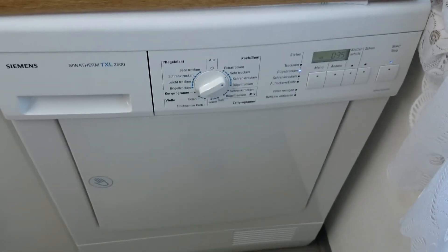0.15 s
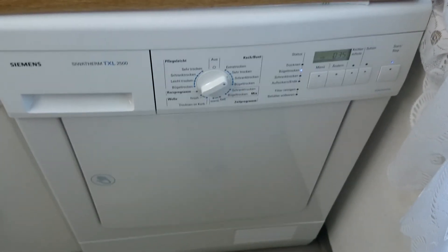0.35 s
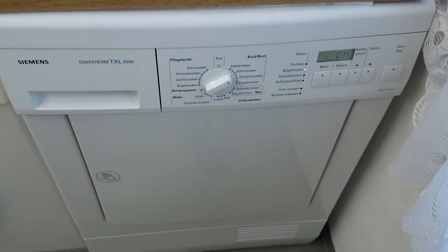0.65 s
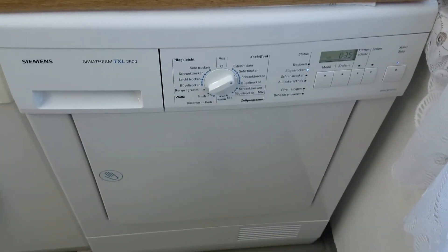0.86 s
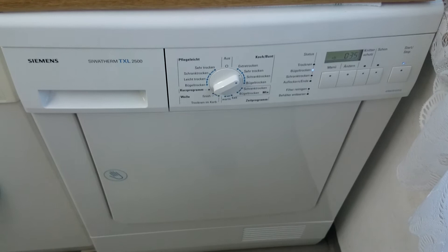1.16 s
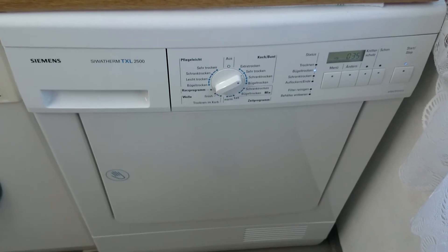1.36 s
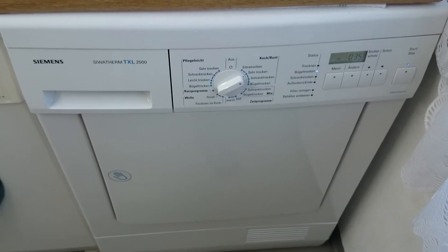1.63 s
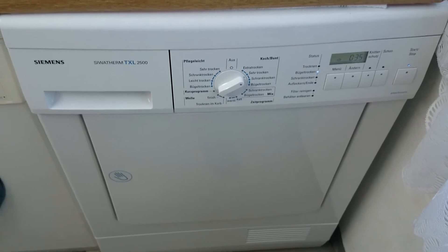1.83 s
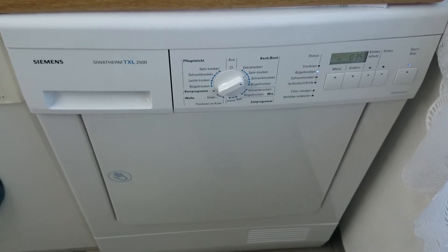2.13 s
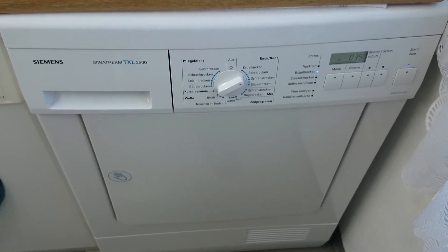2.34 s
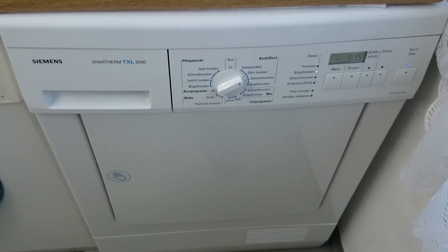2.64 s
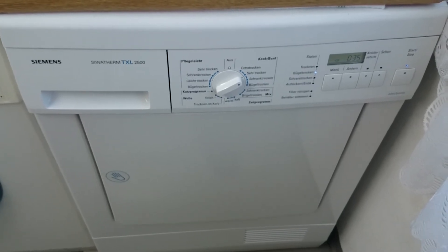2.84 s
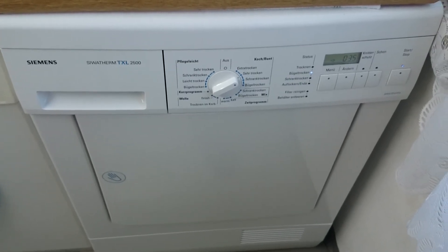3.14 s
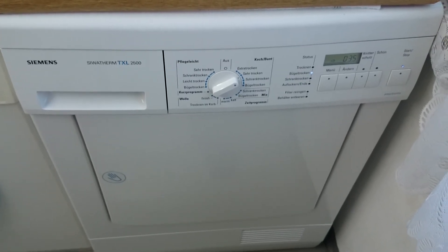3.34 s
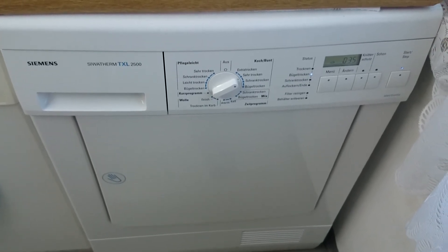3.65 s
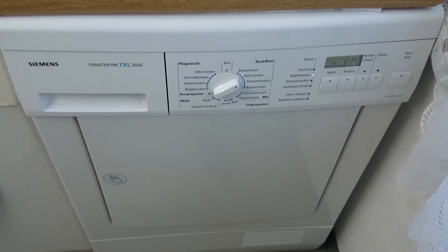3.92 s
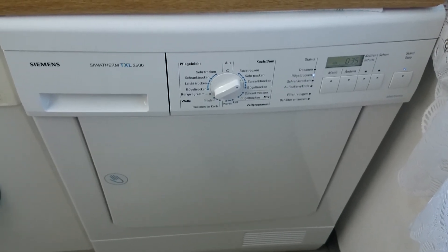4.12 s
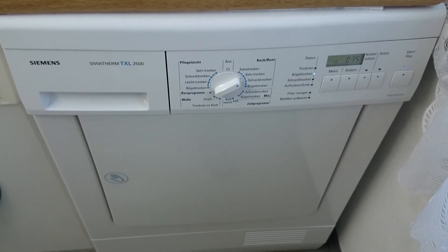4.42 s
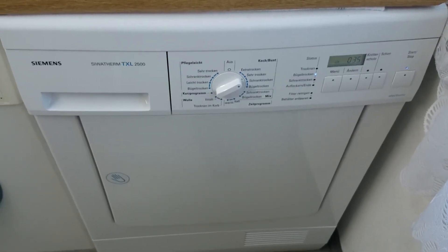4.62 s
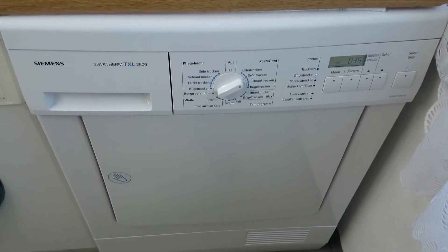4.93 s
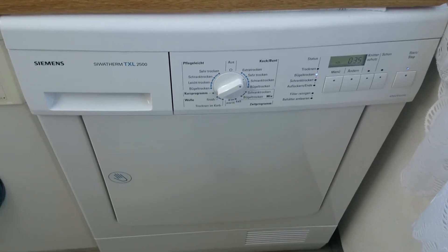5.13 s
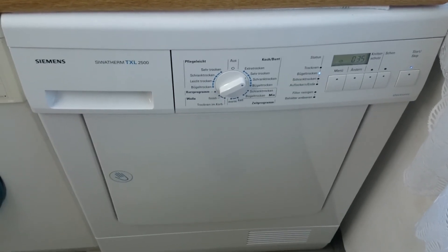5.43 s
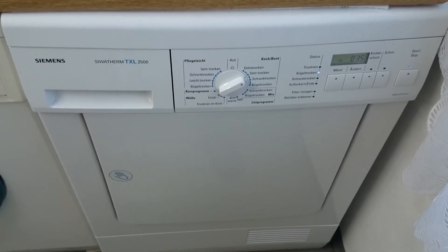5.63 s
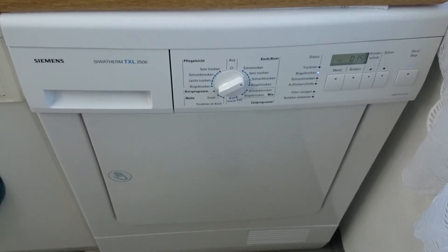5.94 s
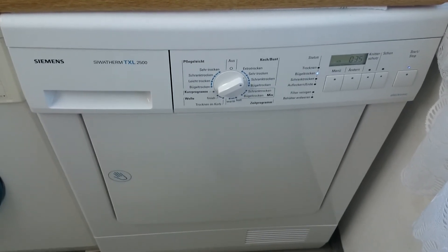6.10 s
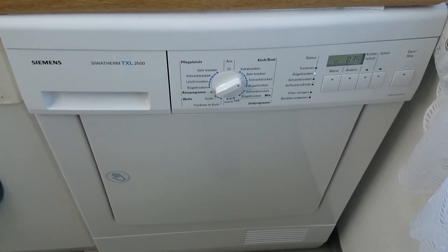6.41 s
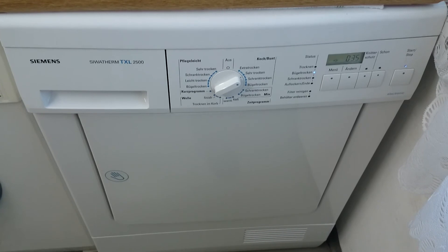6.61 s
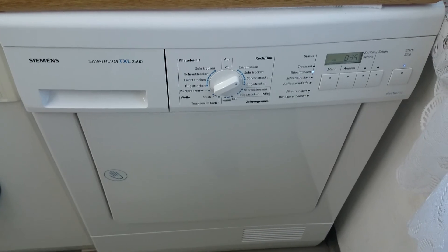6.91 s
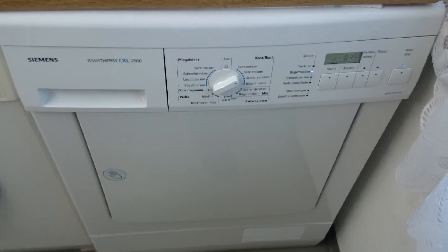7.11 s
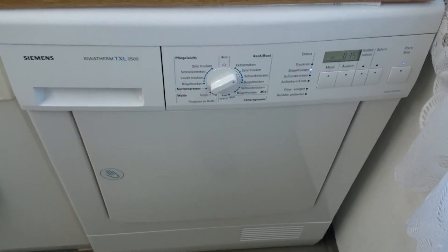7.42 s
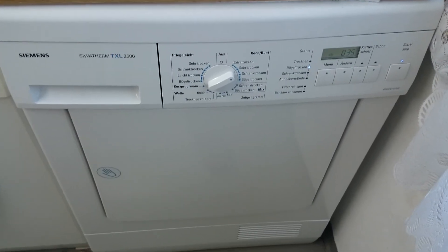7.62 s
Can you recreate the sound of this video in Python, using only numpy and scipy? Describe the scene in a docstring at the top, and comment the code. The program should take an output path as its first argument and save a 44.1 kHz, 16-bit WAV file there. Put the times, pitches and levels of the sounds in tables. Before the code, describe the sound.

Steady dryer drone, deep and slightly heavier on the right, with faint whine and airy hiss more on the left. Every second or so the load tumbles, swishing and dropping dully at irregular moments. One hard little button tick rings the drum. Slow low grip pressure stirs the right side, and a late fingertip knock gives a thud and click.

```python
"""In a small room, a tumble dryer runs close to a hand-held camera with a left and a right port.
Its motor hums and sags once per turn, as sines locked to the shaft angle; other tones hold their pitch.
The drum rumbles through the cabinet panels and air rushes in the ducts, both as shaped noise.
Laundry swishes and lands as decaying noise, and a button rings the drum wall as damped sines.
The hand's grip presses as slow noise; near the end a finger knocks the camera body."""
import sys
import numpy as np
from scipy import signal
from scipy.fft import rfft, irfft, next_fast_len
from scipy.io import wavfile
from scipy.ndimage import uniform_filter1d, map_coordinates

SR = 44100
rng = np.random.default_rng(int(sys.argv[2]) if len(sys.argv) > 2 else 0)


def log_audio(samples):
    """Write samples as a 16-bit WAV file to the path given in sys.argv[1]."""
    # one column per channel
    frames = np.atleast_2d(samples).T
    # limit to full scale, then quantise
    limited = np.clip(frames, -1, 1)
    pcm = np.round(limited * 32767).astype(np.int16)
    wavfile.write(sys.argv[1], SR, pcm)


N = 342304  # length [samples]


def amp(db):
    """Decibel law: level to amplitude gain."""
    return 10 ** (np.asarray(db) / 20)


def unit(x):
    """Normalisation to an rms of 1."""
    return x / np.sqrt(np.mean(x ** 2) + 1e-20)


def along(points, hz):
    """Interpolation of each value column of a spectrum on a logarithmic frequency axis."""
    f, *columns = np.transpose(points)
    return np.array([np.interp(np.log(hz + 1), np.log(f + 1), column) for column in columns])


def wobble(rate):
    """Random modulation: a smooth curve through rate random knots a second."""
    knots = rng.standard_normal(int(N * rate / SR) + 4)
    return map_coordinates(knots, [np.arange(N) * rate / SR])


def filtered(x, response):
    """Linear filtering: the spectrum of x times a response of frequency."""
    size = next_fast_len(N + SR // 2)
    hz = np.fft.rfftfreq(size, 1 / SR)
    return irfft(rfft(x, size) * response(hz), size)[..., :N]


def bell(hz, centre, width):
    """Resonance: a steep-sided gain curve, 1 at its centre."""
    return 1 / (1 + (np.sqrt(2) * (hz - centre) / width) ** 2)


def add(track, s, sound):
    """Superposition: mix a sound into a track at a time in seconds."""
    part = track[..., round(s * SR):][..., :sound.shape[-1]]
    part += sound[..., :part.shape[-1]]


TURN_S = 1.19  # one turn of the drum


def turning(peak_s, count=1):
    """Periodic modulation: between -1 and 1, count times per turn of the drum, highest at peak_s."""
    return np.cos(2 * np.pi * count * (np.arange(N) / SR - peak_s) / TURN_S)


def swells(rows):
    """Gaussian envelopes in dB, one per (middle, length at half height, height) row."""
    t = np.arange(N) / SR
    return sum(db * .5 ** ((2 * (t - s) / length) ** 2) for s, length, db in rows)


# interaural-style phase between the ports: (frequency [Hz], lead of the left port [rad])
PORT_LEAD = [(40, 0.78), (100, 0.47), (180, 0.52), (400, 0.5), (540, 0.86), (750, 0.72), (1000, 0.13),
             (1500, 0.34), (3000, -1.7), (7000, -2)]


def tone(phase, hz):
    """Phase difference between ports: a sine of rms 1, split evenly about its own phase."""
    lead = along(PORT_LEAD, hz)[0]
    return np.sqrt(2) * np.sin(phase + lead * np.array([[.5], [-.5]]))


# motor, fan and bearing tones: (multiple of the shaft speed [1], left level [dB], right level [dB])
SHAFT_TONES = [(2, -75, -55), (3.954, -66.5, -63), (16.08, -68, -75.5), (16.89, -68.5, -71),
               (25.06, -63.5, -70.5), (29.9, -77, -72.5), (31.06, -91, -67), (32.16, -71.5, -77.5)]
# mains hum and other steady tones: (frequency [Hz], left level [dB], right level [dB])
STEADY_TONES = [(98.9, -52, -50), (142, -64, -61), (176, -64.5, -62), (186, -62.5, -58.5),
                (243.4, -61.5, -60), (368.5, -69.5, -66.5), (401, -67, -68.5)]
# mean motor speed, its swing as the load is lifted and dropped, and its random drift
SHAFT_HZ, SAG_HZ, WANDER_HZ = 43.91, 0.258, 0.059
FASTEST_S = 0.072  # when in the turn the load has fallen and the motor runs freest
DRONE_DB, DRONE_WAVER_DB = (-41, -34.5), 0.35  # hum of the unbalanced shaft (left, right), random waver
# the hum swells once and twice a turn: when both peak, and how far
DRONE_PEAK_S, ONCE_DB, TWICE_DB = 0.27, 0.5, 1.74
STEADY_WAVER_DB = 1.34  # random level waver of the steady tones


def motor(flutter_db=2, drift=0.31):
    """Order-locked tones: shaft, fan and bearings follow the motor speed; steady tones do not."""
    speed = SHAFT_HZ + SAG_HZ * turning(FASTEST_S) + WANDER_HZ * wobble(4)
    angle = 2 * np.pi * np.cumsum(speed) / SR
    swell_db = ONCE_DB * turning(DRONE_PEAK_S) + TWICE_DB * turning(DRONE_PEAK_S, count=2)
    swell_db = swell_db + DRONE_WAVER_DB * wobble(3.2)
    out = amp(DRONE_DB)[:, None] * amp(swell_db) * tone(angle, speed.mean())
    for multiple, *ports_db in SHAFT_TONES:
        flutter = amp(flutter_db * wobble(6))
        phase = multiple * angle + drift * wobble(9)
        out += amp(ports_db)[:, None] * flutter * tone(phase, multiple * speed.mean())
    for hz, *ports_db in STEADY_TONES:
        phase = 2 * np.pi * hz * np.arange(N) / SR + hz / 1100 * wobble(6)  # high lines waver most
        waver = amp(STEADY_WAVER_DB * wobble(4.0))
        out += amp(ports_db)[:, None] * waver * tone(phase, hz)
    return out


# coherence of the noise at the two ports: (frequency [Hz], left-right likeness [1])
PORT_LIKENESS = [(30, 0.91), (45, .97), (75, 0.41), (180, 1), (420, 0.95), (600, 0.24), (900, 0.84),
                 (1350, 0.26), (1650, 0.1), (4000, 0.16), (9000, 0.061)]


def rush(gain, patchy_db):
    """Partly coherent noise at both ports, patchy in time and frequency, with gain(hz) per root Hz."""
    z = signal.stft(rng.standard_normal((2, N)), nperseg=1024)[2]
    patches = rng.standard_normal(z.shape[1:])
    patches = uniform_filter1d(uniform_filter1d(patches, size=7, axis=0), size=8, axis=1)
    pair = unit(signal.istft(z * amp(patchy_db * unit(patches)), nperseg=1024)[1][:, :N])

    def mid_side_gains(hz):
        turn = np.arccos(np.clip(along(PORT_LIKENESS, hz)[0], -1, 1)) / 2
        return np.array([np.cos(turn), np.sin(turn)])

    mid, side = filtered(pair, mid_side_gains)
    ports = np.array([mid + side, mid - side]) * np.sqrt(SR / 2)
    return filtered(ports, lambda hz: gain(hz) * np.exp(.5j * along(PORT_LEAD, hz) * [[1], [-1]]))


# cabinet and duct resonances:
# (frequency [Hz], width [Hz], left level [dB per Hz], right level [dB per Hz])
CABINET_MODES = [(55, 36, -72.5, -62.5), (89.3, 10.4, -70, -63), (107.5, 19.8, -71.5, -61.5),
                 (136.2, 10.3, -64.5, -63.5), (182.7, 17.3, -68.5, -68.5), (232, 41.6, -74.5, -70),
                 (336.6, 37.6, -72, -79.5), (389.2, 53.4, -74, -72.5), (453, 43, -76, -88),
                 (861, 62, -83.5, -85), (909, 43, -80.5, -87), (1073, 26, -82.5, -84),
                 (1185, 80, -82, -100), (1411, 43, -82.5, -84.5), (1450, 38, -79, -109),
                 (1500, 18, -79, -100), (3413, 55, -93.5, -106), (3750, 130, -99, -110),
                 (7580, 57, -101, -120), (12940, 910, -110, -125)]
# air in the ducts: (frequency [Hz], left level [dB per Hz], right level [dB per Hz])
DUCT_AIR = [(20, -90, -117), (60, -99, -94), (293, -78, -83), (430, -82, -84), (584, -83, -84),
            (810, -84, -87.5), (1110, -86, -87.5), (1310, -89, -91.5), (1846, -93.5, -97.5),
            (2170, -100, -102), (2570, -112, -114), (6000, -135, -135)]
# air hiss at the vents: (frequency [Hz], left level [dB per Hz], right level [dB per Hz])
VENT_HISS = [(900, -125, -125), (2050, -101, -103), (2660, -99, -100), (3280, -99, -102), (4300, -99, -104),
             (4940, -103, -103), (6740, -103, -101), (7250, -100, -109), (7680, -95.5, -111),
             (8720, -104, -114), (10300, -106, -115), (11460, -117, -117), (13100, -114, -114),
             (15000, -120, -123)]
# larger pieces sliding down the drum wall: (middle [s], length [s], rise over the hiss [dB])
SLIDING_PIECES = [(2.3, 0.14, 1), (3.13, 0.092, 4), (4.31, 0.097, 4), (4.73, 0.14, 1)]
TUMBLE_S, TUMBLE_DB = 1.11, 0.58  # when in the turn the falling load rumbles most, and by how much
SLIDE_S, SLIDE_DB = 1.15, 0.5  # when in the turn the laundry slides most, and by how much
RUB_S = 1.08  # when in the turn the seal rubs most


def drum_and_air(rub_db=4, churn_db=0.5, uneven_db=0.23):
    """Resonance and turbulence: the drum shakes the cabinet; air and sliding laundry hiss."""
    rumble_db = TUMBLE_DB * turning(TUMBLE_S) + uneven_db * wobble(4.15)  # no two turns fall alike
    swish_db = SLIDE_DB * turning(SLIDE_S) + swells(SLIDING_PIECES)
    churn = churn_db * wobble(14)  # the load slumps unevenly

    def panels(hz):
        power = sum((amp(ports_db)[:, None] * bell(hz, centre, width)) ** 2
                    for centre, width, *ports_db in CABINET_MODES)
        return np.sqrt(power)

    rumble = rush(panels, patchy_db=0.85) * amp(rumble_db)
    duct = rush(lambda hz: amp(along(DUCT_AIR, hz)), patchy_db=1.73) * amp(rumble_db + churn)
    hiss = rush(lambda hz: amp(along(VENT_HISS, hz)), patchy_db=1.52) * amp(swish_db + 1.3 * churn)
    rub = ((1 + turning(RUB_S)) / 2) ** 5  # the drum seal whispers once a turn
    # added to the hiss, this changes its level above 11400 Hz
    seal = filtered(hiss, lambda hz: hz > 11400) * (amp(rub_db * rub - 1.5) - 1)
    return rumble + duct + hiss + seal


# spectrum of the hand's pressure on the port: (frequency [Hz], relative level [dB])
PRESSURE_SPECTRUM = [(1, -12.5), (3, -8), (8, -7), (14, -7), (21, -17), (30, -31), (45, -31), (90, -68),
                     (300, -107)]
# the hand shifts its grip: (middle [s], length [s], rise over the resting hand [dB])
GRIP_SHIFTS = [(.63, 0.35, 6), (3.1, 0.11, 8), (7.25, 0.23, 11.5)]
# the camera shell clicks when pressed and when let go: (time [s], relative level [dB])
SHELL_CLICKS = [(7.1462, -8.5), (7.1586, -25)]
# modes of the shell: (frequency [Hz], relative level [dB], t60 [s])
SHELL_MODES = [(2660, -17.5, 0.0016), (3700, -29, 0.0081), (4060, -33, 0.018), (5500, -31, 0.0059),
               (8180, -13.5, 0.0036), (10400, -12, 0.0021), (12700, -7.5, 0.0028)]
# the soft first touch, a single mode: (frequency [Hz], relative level [dB], t60 [s])
BRUSH_MODE = (140, -6.5, 0.026)
# modes of the struck port: (frequency [Hz], relative level [dB], t60 [s])
PORT_MODES = [(64.6, -15, 0.11), (187, -17, 0.027), (386, -4.5, 0.021), (810, -3.5, 0.0082),
              (1070, -11, 0.0088), (1300, -18, 0.0098)]
GRIP_DB, SETTLE_DB_PER_S = -24, 0.42  # pressure swings of the resting hand, fading as it settles
BRUSH_S, STRIKE_S = 7.1205, 7.1466  # a fingertip brushes the right port, then strikes it


def hand(waver_db=1.0):
    """Near-field pressure and modal ringing: grip and finger on the right port, clicks in the shell."""
    t = np.arange(SR // 8) / SR

    def ring(hz, t60):
        return np.sin(2 * np.pi * hz * t) * amp(-60 * t / t60)

    def push(hz, db, t60):
        return -amp(db) * ring(hz, t60) * (1 - np.exp(-t / 0.0026))

    pressure = filtered(rng.standard_normal(N), lambda hz: amp(along(PRESSURE_SPECTRUM, hz)[0]))
    swing = unit(pressure)
    swing /= np.sqrt(uniform_filter1d(swing ** 2, size=SR // 3) + 0.012)  # evens out the level
    settling_db = GRIP_DB - SETTLE_DB_PER_S * np.arange(N) / SR
    swing *= amp(settling_db + swells(GRIP_SHIFTS) + waver_db * wobble(3.03))
    click, thud = np.zeros(N), np.zeros(N)
    shell_ring = sum(amp(level) * ring(hz, t60) for hz, level, t60 in SHELL_MODES)
    for s, db in SHELL_CLICKS:
        add(click, s, amp(db) * shell_ring)
    add(thud, BRUSH_S, push(*BRUSH_MODE))
    add(thud, STRIKE_S, sum(push(*mode) for mode in PORT_MODES))
    left = click + amp(-30) * thud
    right = swing + thud + amp(-45) * click
    return np.array([left, right])


# laundry landing on the drum:
# (time [s], relative level [dB], knock relative to that [dB], t60 [s])
LANDINGS = [(.132, -52, -2, 0.15), (.15, -44.5, 4, 0.39), (.162, -40, -3, 0.11), (1.178, -50, 8, 0.12),
            (1.215, -51, 7, 0.28), (1.565, -53, 1, .25), (1.605, -40, -8, 0.1), (1.619, -50, 11, 0.15),
            (2.199, -54, 7, .25), (2.398, -45.5, -1, 0.22), (2.683, -49, 0, .16), (3.545, -49.5, -11, 0.17),
            (3.665, -48, -5, .25), (3.752, -48.5, 6.5, 0.3), (3.792, -44, -1, 0.15), (4.26, -51, -7, 0.11),
            (4.755, -45, 2, 0.16), (5.535, -49.5, 3, 0.3), (6.62, -49, 3, 0.61), (7.692, -48.5, 8, 0.075)]
# muffled spectrum of the landings: (frequency [Hz], gain [dB])
LANDING_TONE = [(500, -34), (1100, 16), (1800, 7.5), (3200, 4), (4000, -6.5), (6000, -9), (12000, -41)]
# bundles dropping on the drum wall: (time [s], frequency [Hz], relative level [dB])
BUNDLE_DROPS = [(0.164, 114, -38), (0.581, 136, -54.5), (2.346, 96, -29), (6.082, 103, -30)]
# modes of the drum wall, also rung by the button: (frequency [Hz], width [Hz], relative level [dB])
DRUM_MODES = [(617, 220, -4), (814, 79, -1), (1017, 22, -0.5), (1230, 61, -5)]
RISE_SHARE = 0.036  # time constant of a landing's rise over its t60: long ones come on slowly


def laundry(tick_db=-3, knock_db=0, drop_t60=0.06, crumple_db=2.0):
    """Impact and decay: bundles bump dully; taps rattle in the steel drum, muffled by the door."""
    t = np.arange(SR // 2) / SR
    ticks, knocks, bumps = np.zeros((3, 2, N))
    for s, db, body_db, t60 in LANDINGS:
        fade = amp(-60 * t / t60) * (1 - np.exp(-t / (RISE_SHARE * t60)))
        folds_db = crumple_db * wobble(177)[:len(t)]  # cloth lands fold by fold
        add(ticks, s, amp(db + tick_db + folds_db) * fade * rng.standard_normal((2, len(t))))
        add(knocks, s, amp(db + body_db + knock_db) * fade * rng.standard_normal(len(t)))
    for s, hz, db in BUNDLE_DROPS:
        fade = amp(db - 60 * t / drop_t60) * (1 - np.exp(-t / 0.0064))
        add(bumps, s, fade * tone(2 * np.pi * hz * t, hz))

    def wall(hz):
        return 4 * sum(amp(db) * bell(hz, centre, width) for centre, width, db in DRUM_MODES)

    muffled = filtered(ticks, lambda hz: amp(along(LANDING_TONE, hz)))
    return bumps + (muffled + filtered(knocks, wall)) * amp([[1.5], [-1.5]])


BUTTON_S, BUTTON_DB = 2.684, -35  # a hard button strikes the bare drum wall; peak before panning


def button():
    """Modal damping: one hard contact rings the drum wall, and its broad resonances die first."""
    t = np.arange(SR // 4) / SR
    ring = sum(amp(db) * width * np.sin(2 * np.pi * hz * t) * np.exp(-np.pi * width * t)
               for hz, width, db in DRUM_MODES)
    out = np.zeros(N)
    add(out, BUTTON_S, amp(BUTTON_DB) * ring / np.abs(ring).max())
    return out * amp([[1.5], [-1.5]])


# reverberation of the room: (frequency [Hz], t60 [s])
ROOM_DECAY = [(200, 0.3), (2000, 0.34), (10000, 0.14)]


def room(x):
    """Reverberation: convolution with a short noise tail from the walls, treble dying first."""
    hz, t, z = signal.stft(rng.standard_normal((2, SR // 2)), SR, nperseg=256)
    tail = signal.istft(z * amp(-60 * t / along(ROOM_DECAY, hz).T), SR, nperseg=256)[1]
    return signal.fftconvolve(x, tail / np.linalg.norm(tail[0]), axes=1)[:, :N]


def scene():
    """Superposition of the dryer and the hand on the camera, whose click the room faintly answers."""
    touch = hand()
    dryer = motor() + drum_and_air() + laundry() + button()
    return dryer + touch + amp(-22) * room(touch[:1])


TOP_HZ = 15300  # band limit of the camera


def record(dry):
    """Band limitation: the camera rolls off just under its limit and keeps nothing above it."""
    return filtered(dry, lambda hz: np.clip((TOP_HZ - hz) / 1100, 0, 1))


dry = scene()
out = record(dry)
log_audio(out)
```